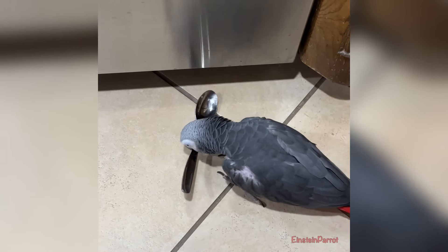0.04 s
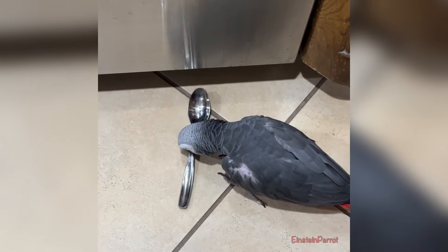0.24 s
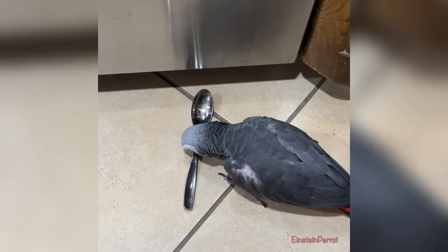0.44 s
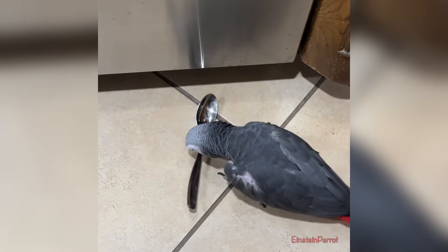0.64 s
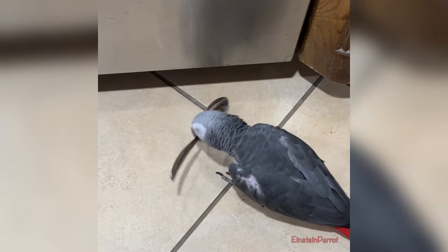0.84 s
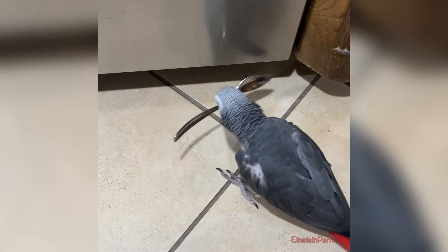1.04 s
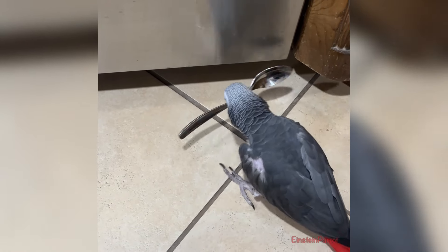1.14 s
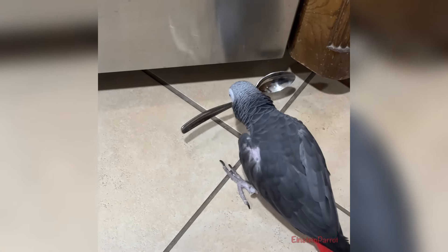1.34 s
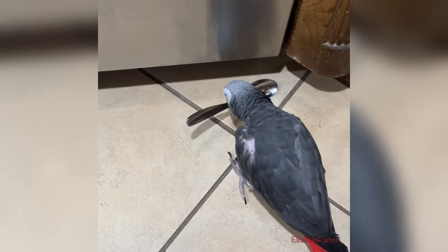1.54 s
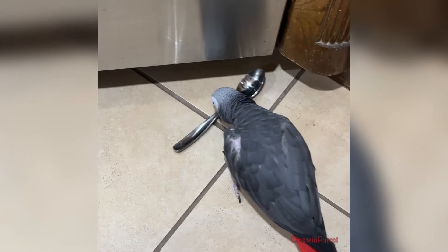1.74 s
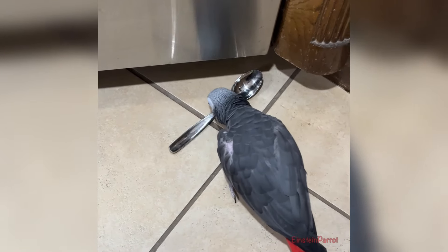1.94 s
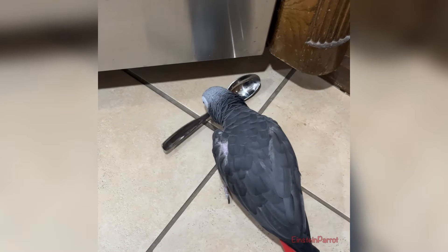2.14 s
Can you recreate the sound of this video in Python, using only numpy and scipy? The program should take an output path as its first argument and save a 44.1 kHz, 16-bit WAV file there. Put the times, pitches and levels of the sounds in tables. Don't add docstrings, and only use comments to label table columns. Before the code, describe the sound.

Steel spoon dropped on a hard tile floor, cracking and rattling, then knocked and dropped again

```python
import sys
import numpy as np
from scipy import signal
from scipy.fft import rfft, irfft, next_fast_len
from scipy.io import wavfile
from scipy.ndimage import uniform_filter1d, minimum_filter1d, map_coordinates

SR = 44100
rng = np.random.default_rng(int(sys.argv[2]) if len(sys.argv) > 2 else 0)


def undo_db(level):
    steps = np.asarray(level, float) / 20
    return 10 ** steps


def generate_wav(signal):
    frames = np.transpose(np.atleast_2d(signal))
    scaled = np.clip(frames, -1, 1) * 32767
    pcm = np.round(scaled).astype(np.int16)
    wavfile.write(sys.argv[1], SR, pcm)


N = 94815
TOP_HZ = 16700


def unit(x):
    return x / np.sqrt(np.mean(x ** 2) + 1e-20)


def along(points, hz):
    f, v = np.transpose(points)
    return np.interp(np.log(hz + 1), np.log(f + 1), v)


def curve(rows):
    return np.interp(np.arange(N) / SR, *np.transpose(rows))


def wobble(rate_hz, count):
    knots = rng.standard_normal((count, 1500))
    places = np.arange(0, N + 8, 8) * rate_hz / SR
    return np.array([map_coordinates(k, [places]).repeat(8)[:N] for k in knots])


def filtered(x, response):
    m = next_fast_len(N + 8192)
    return irfft(rfft(x, m) * response(np.fft.rfftfreq(m, 1 / SR)), m)[..., :N]


def cracks(rows, colour, top_hz, low_hz=100):
    crack_t60 = .003
    out, t = np.zeros(N + 2000), np.arange(400) / SR
    bursts = rng.standard_normal((len(rows), len(t)))
    for (s, db), burst in zip(rows, bursts):
        out[round(s * SR):][:len(t)] += undo_db(db - 60 * t / crack_t60) * burst

    def response(hz):
        return undo_db(along(colour, hz)) / (1 + (hz / top_hz) ** 12) / (1 + low_hz / (hz + 1))
    return filtered(out[:N], response)


def rings(hz, t60, rows, lost_db, flutter, stop_db):
    attack_s, scatter_db, scatter_rad = .002, 1, .5
    rock, sway_hz, buzz, buzz_hz = .2, 70, .06, 500
    swing, t = np.zeros((len(hz), N), complex), np.arange(N) / SR
    contacts_so_far = 1. * np.searchsorted([s for s, _ in rows], t)
    lost_db = lost_db + stop_db * uniform_filter1d(contacts_so_far, size=80, origin=39)
    chances = rng.standard_normal((len(rows), 2, len(hz), 1))
    for (s, db), (size, turn) in zip(rows, chances):
        i = slice(round(s * SR), round(s * SR) + SR // 2)
        age = t[i] - t[i][0]
        fade_db = 60 * age / t60[:, None] + lost_db[i] - lost_db[i][80]
        level = undo_db(db[:, None] + scatter_db * size - fade_db)
        swing[:, i] += level * np.exp(1j * scatter_rad * turn) * (1 - np.exp(-age / attack_s))

    def shake(rate_hz):
        return wobble(rate_hz, count=len(hz)) + 1j * wobble(rate_hz, count=len(hz))
    rocked = swing * (1 + flutter * (rock * shake(sway_hz * flutter) + buzz * shake(buzz_hz)))
    cycles = hz[:, None] * t + rng.random((len(hz), 1))
    tone = (rocked * np.exp(2j * np.pi * cycles)).real.sum(0)
    return tone, np.linalg.norm(swing, axis=0)


# f/Hz, level/dB per Hz
AIR = [(20, -30), (55, -11), (463, -15.5), (1250, -18), (1450, -29), (2650, -29.5), (3000, -43.5),
       (6800, -40), (8000, -53.5)]
# f/Hz, likeness -1 to 1
ALIKE = [(40, 0.94), (90, 0.93), (180, .6), (400, -0.17), (800, -0.42), (1400, -0.21), (2200, 1),
         (9000, 0.71)]
# f/Hz, level/dB
FRIDGE = [(59.2, -64.5), (237, -62.5), (372, -65.5), (420, -66), (770, -64.5), (1126, -69), (1185, -80.5),
          (1244, -74), (13347, -95)]
# t/s, level/dB
BUSTLE = [(0.0, -46), (0.09, -41), (0.25, -51.5), (0.48, -49.5), (0.63, -46.5), (0.89, -57), (1.17, -46.5),
          (1.57, -51.5), (1.74, -47.5), (1.82, -59), (2.15, -57.5)]
# t/s, gain/dB
GAIN = [(0, 1), (1.7, 0), (1.78, -12), (2.15, -10.5)]


def kitchen():
    steady_db, steady_hz, wander_db = -60.5, 756, 6

    def turn(hz):
        return np.arccos(np.clip(along(ALIKE, hz), -1, 1)) / 2

    def air_colour(hz):
        return undo_db(along(AIR, hz)) * [np.cos(turn(hz)), np.sin(turn(hz))]
    mid, side = filtered(rng.standard_normal((2, N)), air_colour)
    air = np.array([mid + side, mid - side])
    low = filtered(air, lambda hz: 1 / (1 + (hz / steady_hz) ** 8))
    hz, db = np.transpose(FRIDGE)[:, :, None]
    levels = undo_db(db + 1.0 + wander_db * wobble(22, count=len(FRIDGE)))
    hum = levels * np.sin(2 * np.pi * hz * np.arange(N) / SR)
    steady = undo_db(steady_db) * unit(air - low) + hum.sum(0)
    bustle_level = undo_db(curve(BUSTLE) + 3.7 * wobble(14.82, count=1))
    return bustle_level * unit(low) * undo_db([[.2], [-.2]]) + undo_db(curve(GAIN)) * steady


# f/Hz, level/dB
RATTLE = [(600, -21.5), (1500, -7), (3000, -5), (4400, 2), (7500, 1), (9500, -0.5), (11500, -28.5),
          (15000, -64.5)]


def chatter():
    touches = rng.standard_normal(N) * undo_db(3.5 * wobble(260, count=1)[0])
    return unit(filtered(touches, lambda hz: undo_db(along(RATTLE, hz))))


# f/Hz, level/dB
TICK = [(500, -40), (1800, -16), (3500, 0), (6000, 0), (10000, -8), (13000, -25), (16500, -45)]


def ticks(rows):
    return cracks(rows, TICK, TOP_HZ)


HELD_HZ = [930, 2966, 4230, 4320, 4500, 5163, 5890, 6788, 7730, 9572, 9932, 11650, 13280, 14640]
# level/dB, t60/s
HELD = [(-26.5, 0.033), (-20.5, 0.26), (-13, .5), (-18.5, 0.75), (-13, 0.058), (-21, 0.05), (-11.5, .08),
        (-22, 0.52), (-6, 0.17), (7.5, 0.025), (-11, 0.045), (-6, 0.033), (-15.5, 0.24), (-15.5, 0.069)]
# t/s, crack level/dB, ring level/dB, loss/dB per octave away from 4600 Hz
KNOCKS = [(0, -53, -41, 8.5), (.028, -77, -47, 13), (.06, -77, -51, 5), (0.114, -84, -61, 4),
          (0.179, -71, -60, 18), (.46, -73, -50, 1), (.53, -72, -50.5, 4), (0.599, -46.5, -33, 17),
          (1.531, -53, -22.5, -7.8), (1.545, -47, -27, -9.5), (1.56, -44, -20.5, 7),
          (1.574, -42, -41, -12.5), (1.586, -49, -33, -5), (1.607, -36, -39, -7.5), (1.637, -52, -32, 14),
          (1.662, -70, -31.5, 6)]


def held_spoon():
    beak_hz, scrape_db, flutter, stop_db = 4600, -11, 3.5, 3.5
    hz, (db, t60) = np.array(HELD_HZ), np.transpose(HELD)
    octaves_away = np.abs(np.log2(hz / beak_hz))
    rows = [(s, ring + db - loss * octaves_away) for s, _, ring, loss in KNOCKS]
    tone, swing = rings(hz, t60, rows, np.zeros(N), flutter, stop_db)
    return tone + undo_db(scrape_db) * swing * chatter() + ticks([row[:2] for row in KNOCKS])


# f/Hz, level/dB, t60/s
LIFTED = [(1647, -6, 1.4), (2918, -2, 1.1), (4242, 10, 1), (5846, -2, .8), (6778, -3, .75), (7682, 0, .8),
          (9496, -8, .4)]
# t/s, level/dB
LIFTS = [
    (0, -61.5),
    (0.458, -49.5),
    (1.931, -56.5),
]


def lifted_spoon():
    hz, db, t60 = np.transpose(LIFTED)
    rows = [(s, db + lift) for s, lift in LIFTS]
    return rings(hz, t60, rows, np.zeros(N), flutter=1.3, stop_db=3.5)[0]


# f/Hz, t60/s
ROOM = [(500, 0.63), (2000, 1), (4200, 0.67), (8000, 0.58), (14000, 0.31)]


def room(x):
    hz, t, z = signal.stft(rng.standard_normal(SR), SR, nperseg=256)
    fade = undo_db(-60 * t / along(ROOM, hz)[:, None])
    tail = signal.istft(z * fade, SR, nperseg=256)[1]
    late = np.pad(x, (300, 0))
    return signal.fftconvolve(late, tail / np.linalg.norm(tail))[:N]


# f/Hz, phase/rad
LEAD = [(900, -1.2), (1400, 0), (3500, 0), (4241, .24), (5832, -.68), (7666, -1.48), (10410, -2.6),
        (14640, -4.1)]


def two_ports(x):
    return filtered(x, lambda hz: np.exp(.5j * along(LEAD, hz) * [[1], [-1]]))


# f/Hz, level/dB
CRACK = [(200, -22.5), (500, -4), (1400, 1.5), (2500, 5), (6000, -10), (10000, 5.5), (14500, -2.5),
         (16500, -9.5)]
# t/s, level/dB, brightest f/Hz, dullest f/Hz
BLOWS = [
    (.204, -30.5, 2300, 700),
    (.2277, -1.5, 16500, 1880),
    (1.5323, -16, 15500, 2510),
    (1.7095, -3, 12000, 493),
    (1.7175, -25.5, 12500, 6070),
]
# t/s, level/dB, f/Hz
THUDS = [
    (.205, -48, 900),
    (0.2266, -26, 436.7),
    (1.71, -25.5, 583),
]
# t/s, tone level/dB, scrape level/dB
SWELLS = [
    (.2277, -42, -42),
    (1.532, -54, -56),
    (1.7095, -14, -36),
]


def landings():
    swell_hz, swell_s, thud_t60 = 7670, .014, .022
    t = np.arange(N) / SR
    tone, scrape = np.sin(2 * np.pi * swell_hz * t), chatter()
    sound = np.zeros(N)
    for s, tone_db, scrape_db in SWELLS:
        swell = np.clip(1 - (s - t) / swell_s, 0, 1) * (t < s)
        sound += swell * (undo_db(tone_db) * tone + undo_db(scrape_db) * scrape)
    for s, db, top_hz, low_hz in BLOWS:
        sound += cracks([(s, db)], CRACK, top_hz, low_hz)
    for s, db, hz in THUDS:
        age = np.maximum(t - s, 0)
        sound += undo_db(db - 60 * age / thud_t60) * np.sin(2 * np.pi * hz * age)
    return sound


SPOON_HZ = [925, 1641, 3026, 4241, 5833, 6772, 7666, 9491, 10410, 9030, 11450, 13175, 13295, 14640]
# level/dB, t60/s, gain toward the handle/dB, gain when struck on edge/dB
SPOON = [(-30.5, 0.97, 2.7, 6), (-19.5, 0.41, 8.5, 3.2), (-21.5, .5, -10, 14.5), (6.4, 0.17, 2.5, -13),
         (0, 0.34, 11.5, 7.7), (-17, 1.1, -13, -7.5), (5.33, 0.66, 5.5, -7.5), (-4, 1.2, 2.1, 11.5),
         (-5.5, .5, -3, -8), (-29.5, .5, 0.5, -3.8), (-42.5, .1, 7.5, -3), (-14, 0.44, -23, 5.5),
         (-2.5, .6, -11, 2.5), (-11.5, 0.45, 4.5, 0.7)]
# t/s, crack level/dB, ring level/dB, bowl -1 to handle 1, flat -1 to edge 1
CONTACTS = [(0.2277, -36, -21, 0.3, 0.16), (0.24, -39, -20.5, 0.56, 0.39), (0.253, -49, -21, 0.7, 0.38),
            (0.267, -43, -23.4, 0.59, -0.08), (0.281, -34, -18, 0.22, 0.09),
            (0.297, -41, -20.5, 0.63, -0.24), (0.318, -43, -22.5, 0.48, -0.62),
            (0.33, -30, -22, 0.76, -0.08), (0.349, -36, -24, 0.017, -0.72), (0.362, -38, -21, 0.8, 0.27),
            (0.375, -38, -25, -0.059, -0.038), (0.39, -55, -28.5, -0.09, -0.92),
            (0.41, -43, -29.5, 0.45, 0.28), (0.43, -52, -45, -0.89, 0.24), (0.447, -57, -38, -0.68, -1.1),
            (1.7095, -33, -21, -0.3, 0.34), (1.7225, -45, -18.5, 0.071, 0.68),
            (1.738, -47, -22.5, 0.23, 0.13), (1.7475, -42, -20.5, 0.046, -0.15),
            (1.758, -36, -17.5, -0.4, 0.37), (1.777, -39, -23.5, -0.85, -0.11),
            (1.794, -42, -18, -0.46, -0.028), (1.807, -29, -21.5, -0.42, -0.0051),
            (1.8195, -33, -27, -0.99, -0.83), (1.83, -48, -23, -0.26, 0.72),
            (1.841, -43, -22.5, -0.49, -0.42), (1.856, -46, -37, -1.6, -0.29),
            (1.872, -35, -34, -0.02, 0.68), (1.888, -55, -35, -0.36, -0.55), (1.91, -53, -35, 0.31, 0.14)]
# t/s, loss/dB per s
GRIP = [(0, 73.5), (.44, 56.5), (.47, 163), (.6, 75), (1.7, 39.5), (1.9, 67), (1.95, 102), (2.15, 100)]


def free_spoon():
    rattle_db, tick_db, stop_db = -23.5, 13.5, 10
    hz, (db, t60, handle, edge) = np.array(SPOON_HZ), np.transpose(SPOON)
    rows = [(s, ring + db + place * handle + tilt * edge) for s, _, ring, place, tilt in CONTACTS]
    grip_db = np.cumsum(np.abs(curve(GRIP))) / SR
    tone, swing = rings(hz, t60, rows, grip_db, 1, stop_db)
    clicks = ticks([(s, crack + tick_db) for s, crack, *_ in CONTACTS])
    return tone + undo_db(rattle_db) * swing * chatter() + clicks


def scene():
    wet_db = -14.5
    spoon = held_spoon() + lifted_spoon() + landings() + free_spoon()
    return two_ports(spoon + undo_db(wet_db) * room(spoon)) + kitchen()


def low_pass(x):
    return signal.sosfilt(signal.butter(12, 16680, fs=SR, output="sos"), x)


def record(dry):
    ceiling, hold = 1, round(.003 * SR)
    need = np.minimum(1, ceiling / (np.abs(dry).max(0) + 1e-9))
    gain = uniform_filter1d(minimum_filter1d(need, 2 * hold), hold)
    mix = filtered(dry * gain, lambda hz: hz < TOP_HZ)
    return low_pass(mix)


dry = scene()
out = record(dry)
generate_wav(out)
```